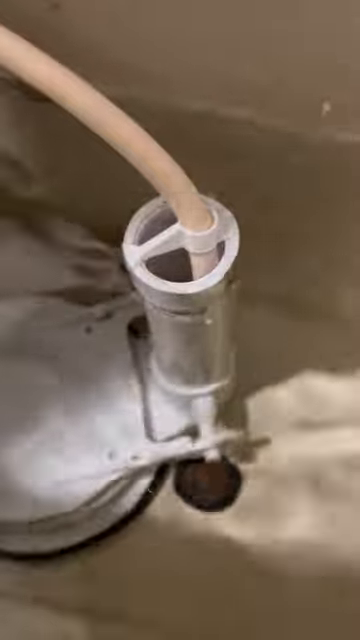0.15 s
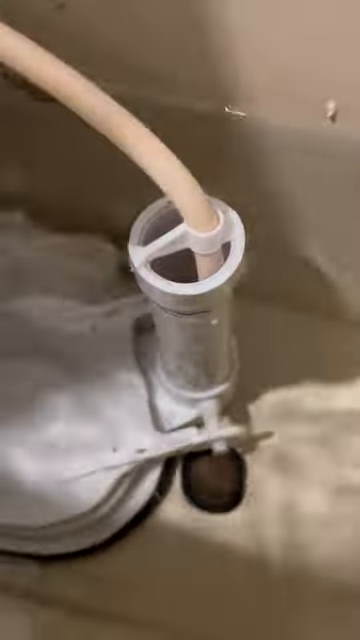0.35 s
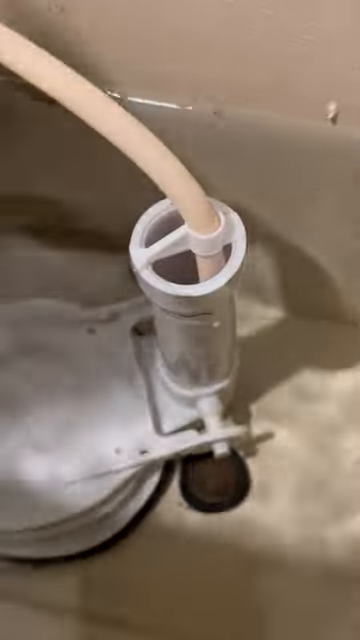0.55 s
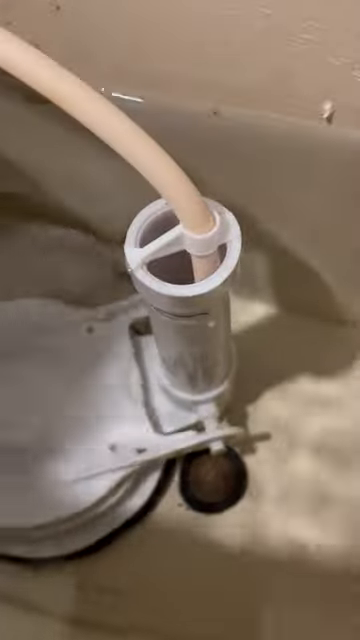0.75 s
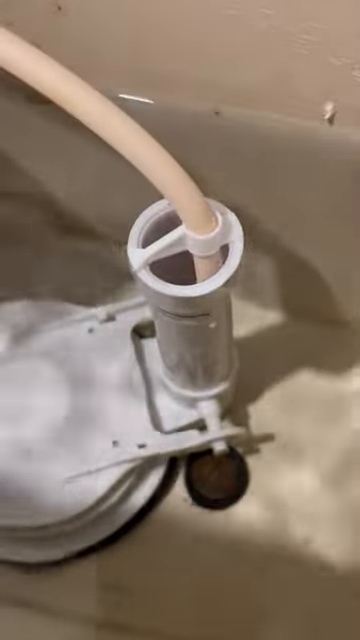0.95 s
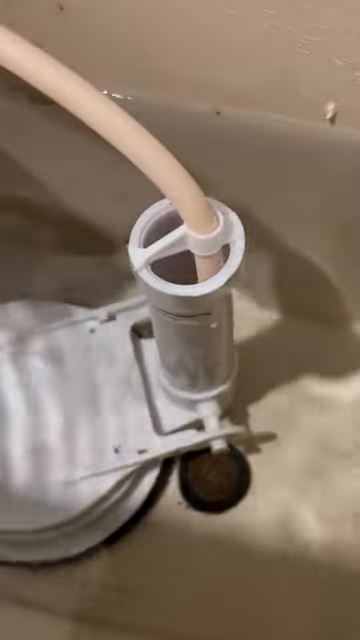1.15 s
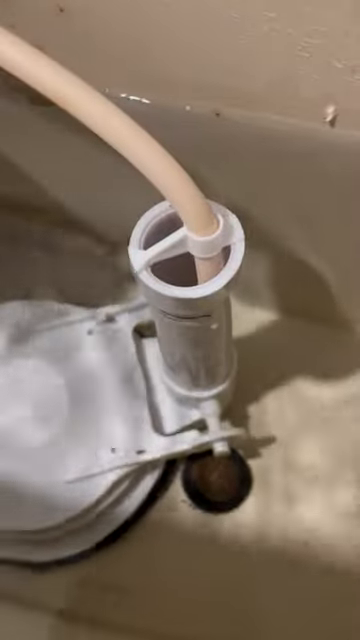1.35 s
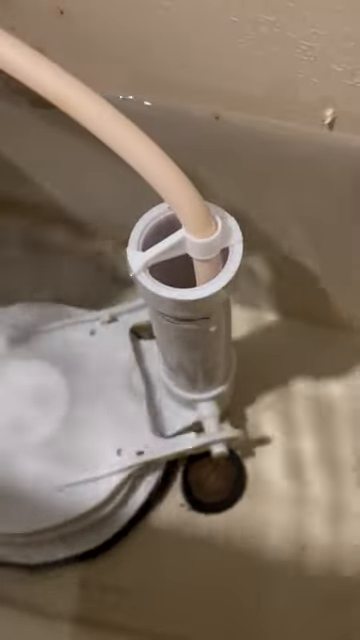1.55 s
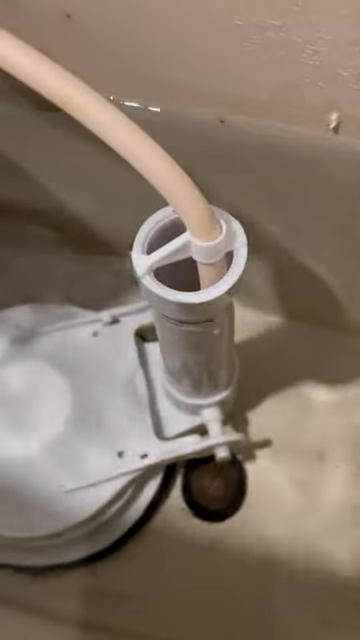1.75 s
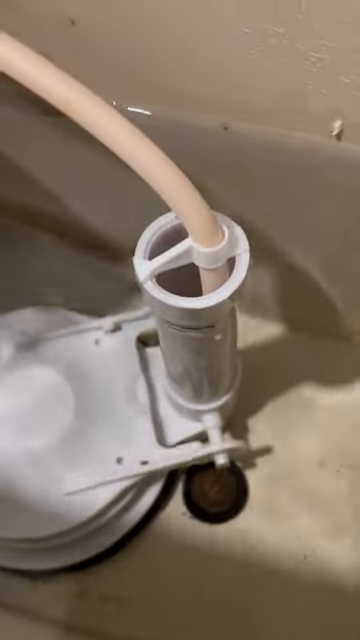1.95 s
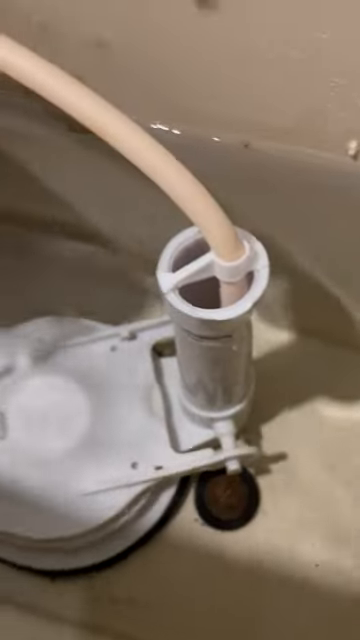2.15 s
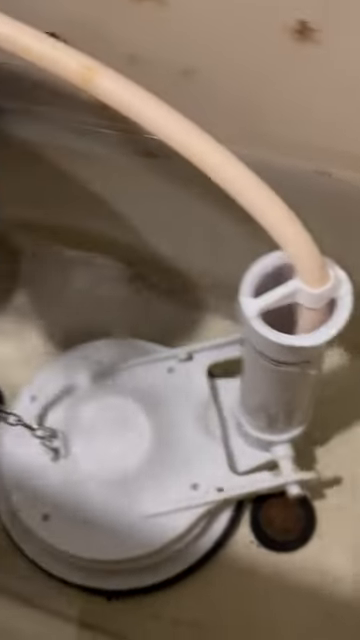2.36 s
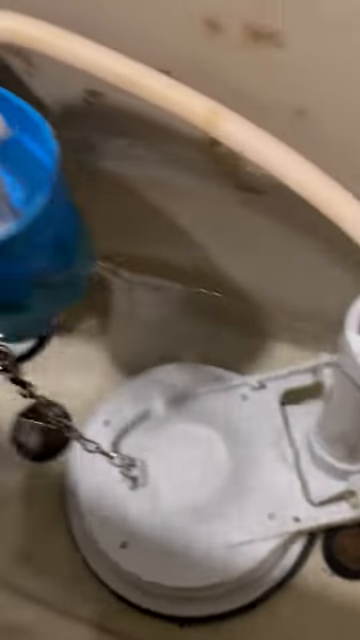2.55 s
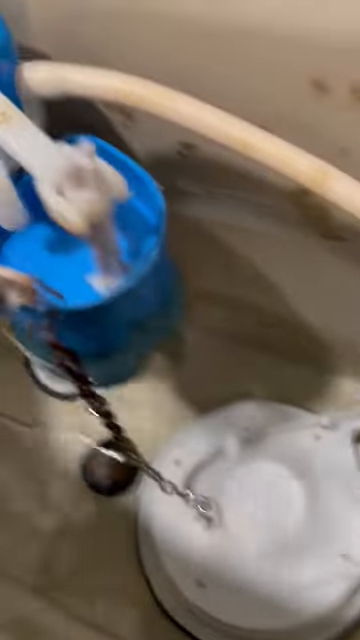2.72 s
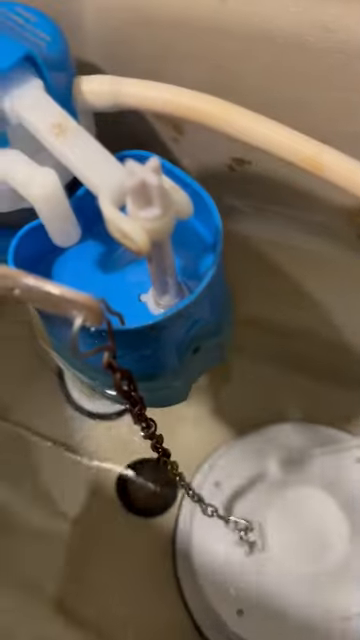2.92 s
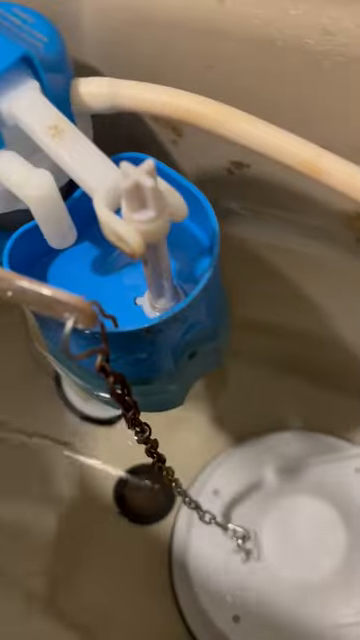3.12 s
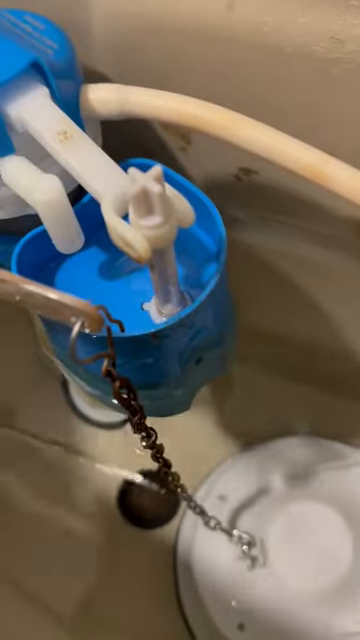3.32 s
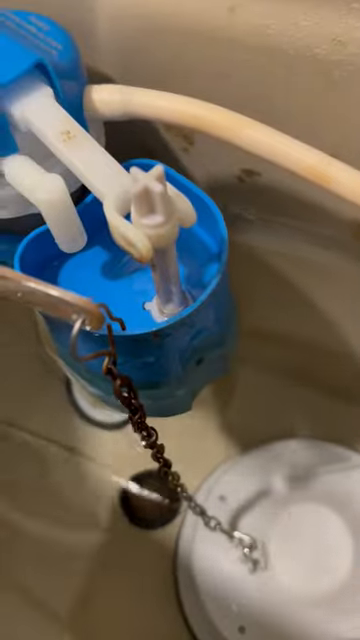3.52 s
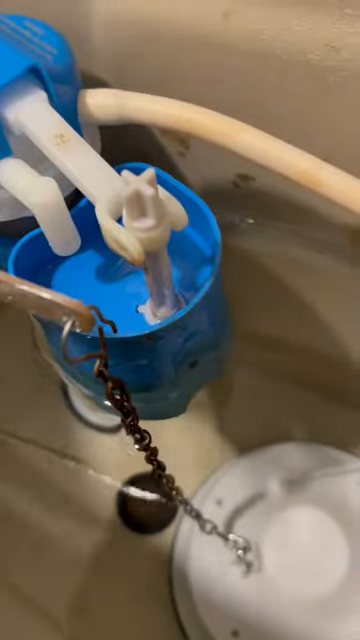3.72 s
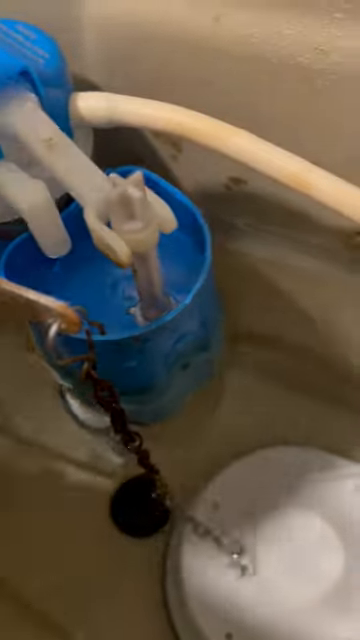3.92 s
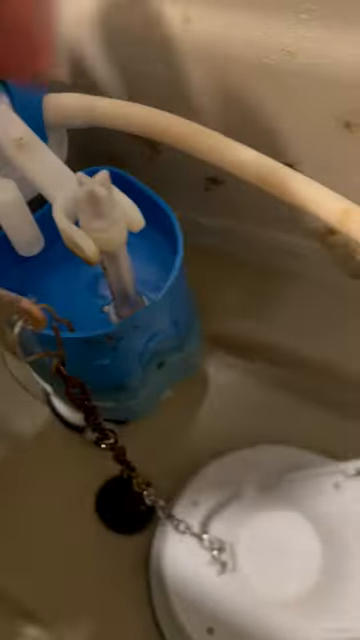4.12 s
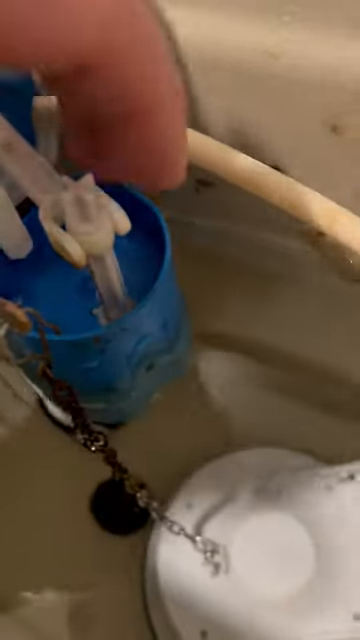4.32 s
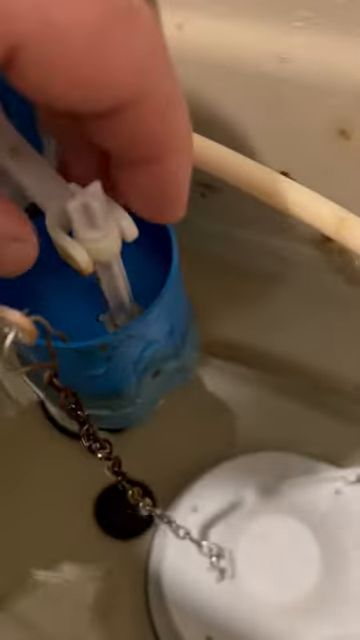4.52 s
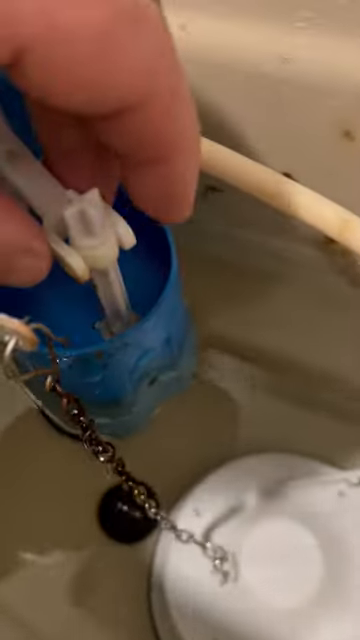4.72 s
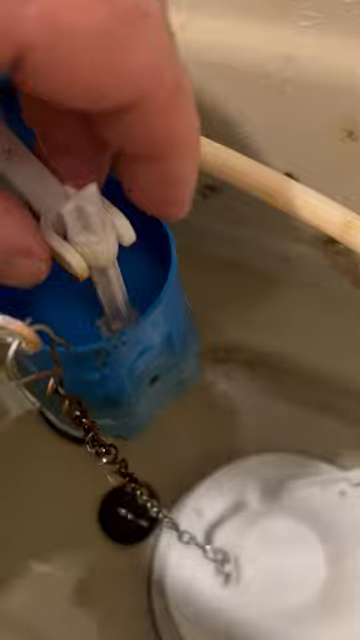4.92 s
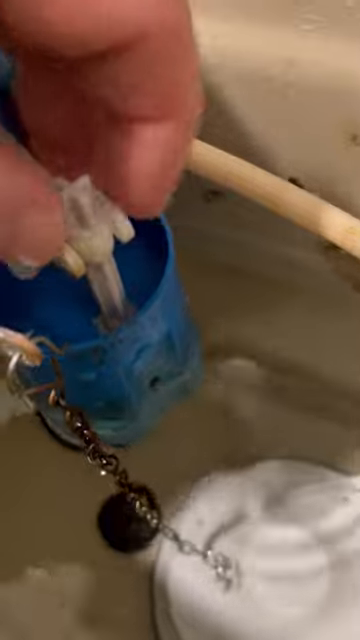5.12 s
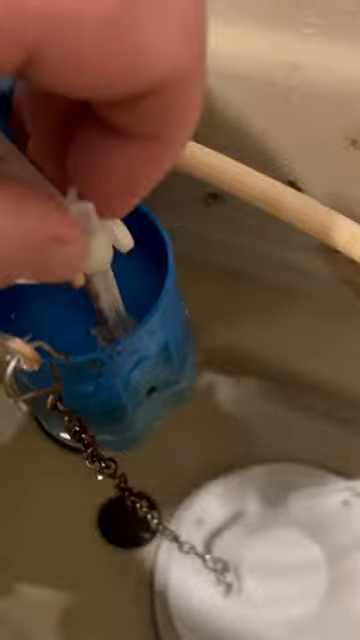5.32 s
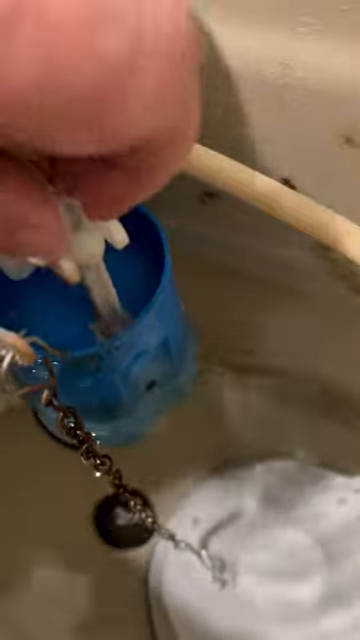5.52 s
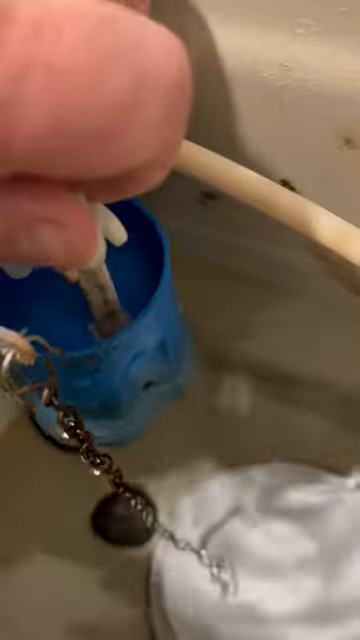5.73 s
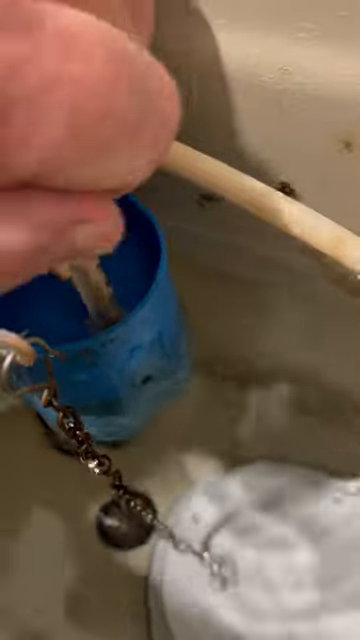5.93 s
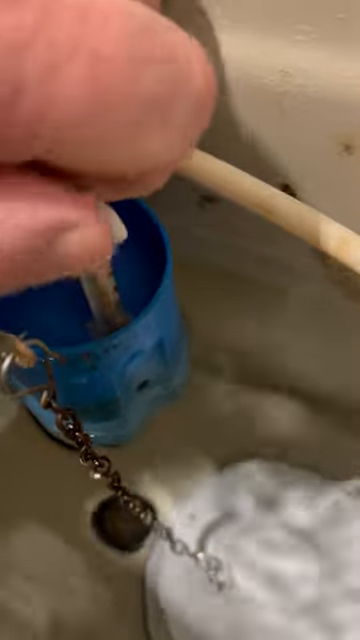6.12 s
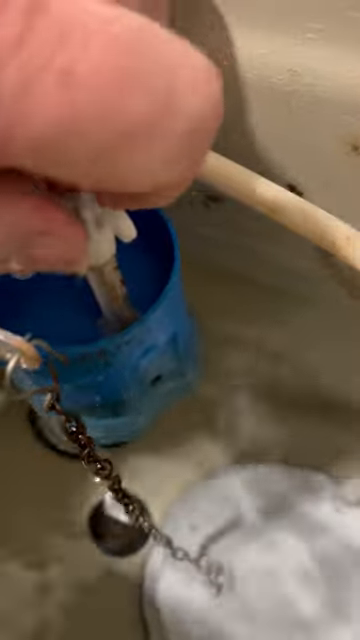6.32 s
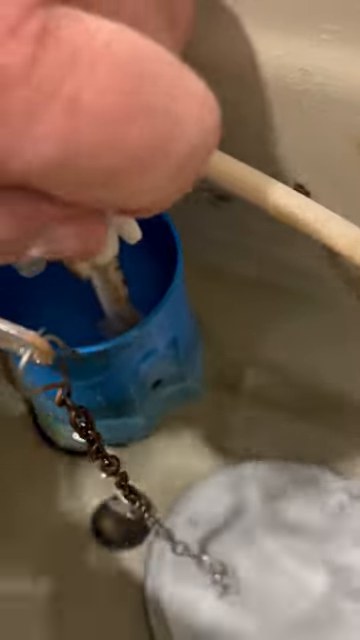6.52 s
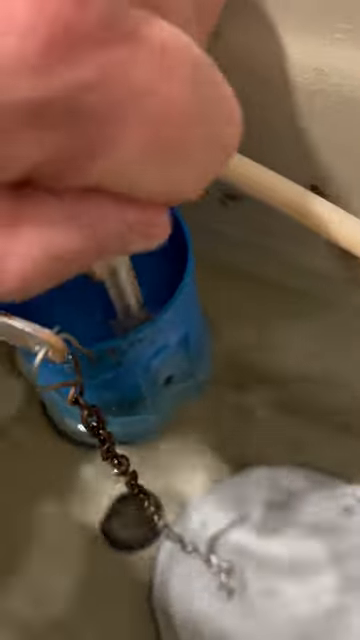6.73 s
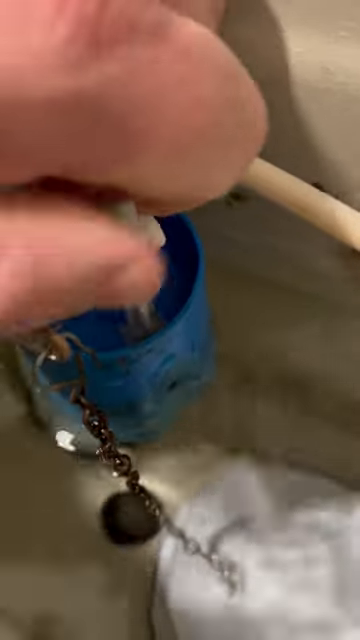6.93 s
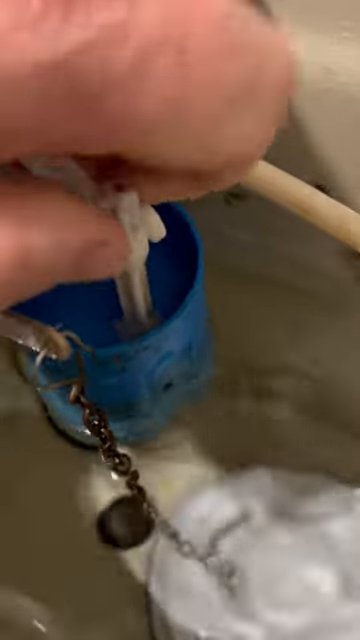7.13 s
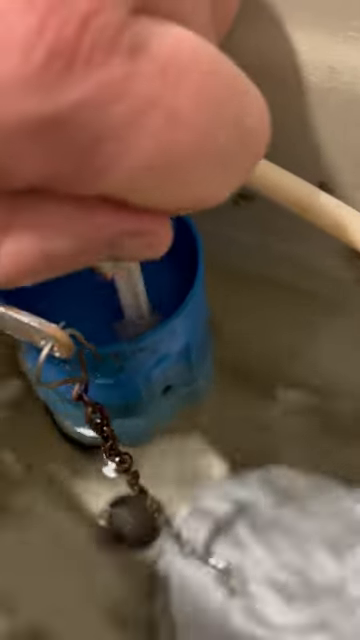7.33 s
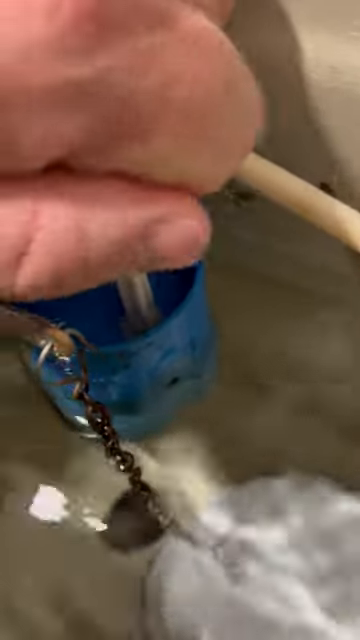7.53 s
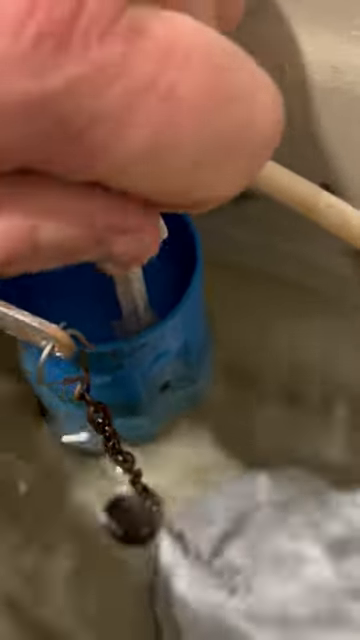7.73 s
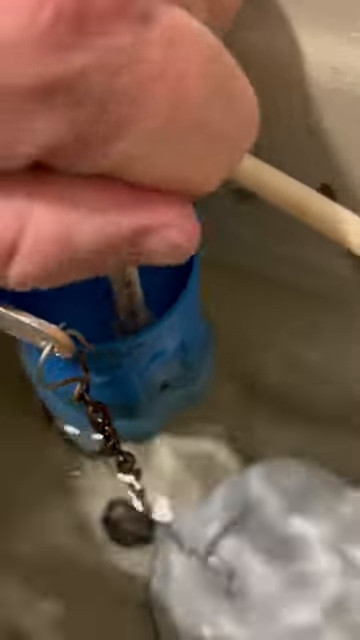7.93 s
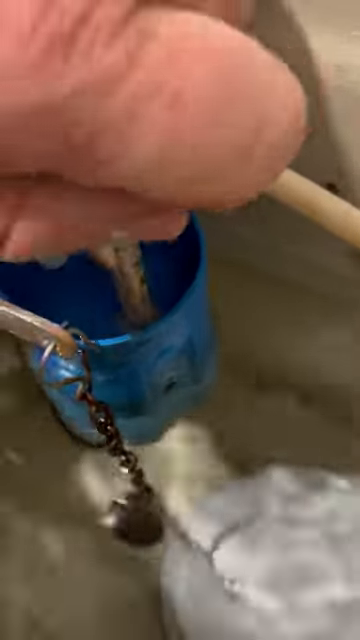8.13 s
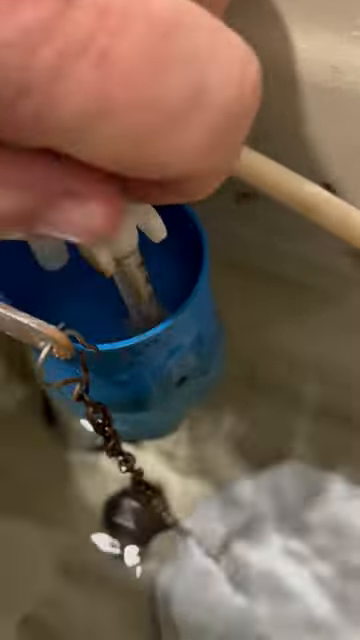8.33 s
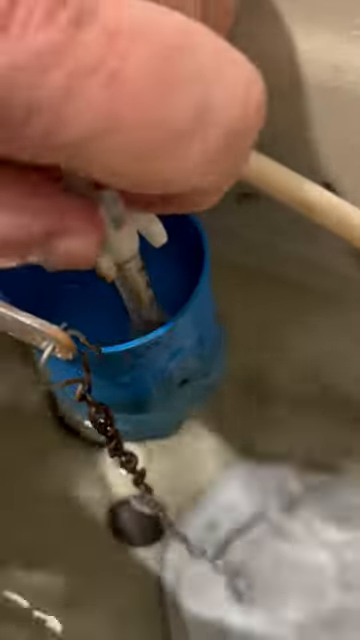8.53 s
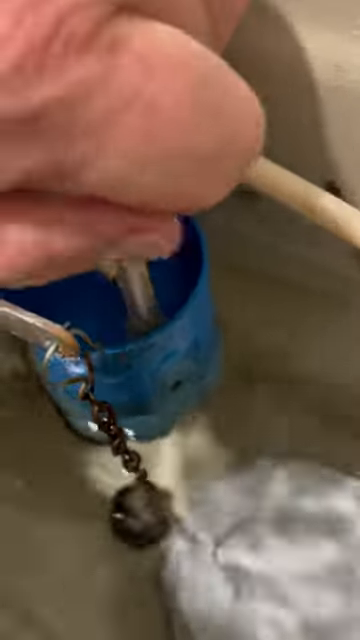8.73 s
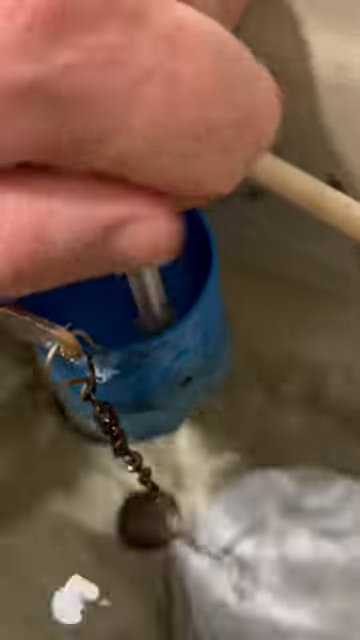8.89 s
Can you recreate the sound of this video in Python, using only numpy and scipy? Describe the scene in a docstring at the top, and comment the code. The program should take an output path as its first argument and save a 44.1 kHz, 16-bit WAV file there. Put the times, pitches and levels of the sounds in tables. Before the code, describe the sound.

Close above an open toilet tank in a small hard-walled bathroom, a faint, bright fill-valve hiss runs steadily over soft low water rumble. It shifts tone as the microphone moves, then stops suddenly. A hand works the float: loose plastic ticks and rubs, sharp double clacks hit the stop, hollow thuds shake the tank, water sloshes and gulps, and the valve spits briefly after each clack.

```python
"""Open toilet tank, handled float

A phone held just above an open tank in a small bathroom. The fill valve hisses (shaped noise) while the phone
moves from the flapper to the float; a hand lifts the float arm and the hiss stops. The hand works the float:
the linkage rubs (grains), ticks and clacks twice against its stop (noise bursts), then the valve spits (noise);
the tank thuds (ringing modes), and the water sloshes (noise) and gulps (rising sines)."""
import sys
import numpy as np
from scipy import signal
from scipy.fft import rfft, irfft, next_fast_len
from scipy.io import wavfile
from scipy.ndimage import uniform_filter1d

SR = 44100
rng = np.random.default_rng(int(sys.argv[2]) if len(sys.argv) > 2 else 0)


def log_audio(samples):
    """Write samples as a 16-bit WAV file to the path given in sys.argv[1]."""
    # one column per channel
    frames = np.atleast_2d(samples).T
    # limit to full scale, then quantise
    limited = np.clip(frames, -1, 1)
    pcm = np.round(limited * 32767).astype(np.int16)
    wavfile.write(sys.argv[1], SR, pcm)


N = 395136
TIME = np.arange(N) / SR
TOP_HZ = 15850  # upper band limit


def undb(db):
    """Decibels to gain."""
    return 10 ** (np.asarray(db) / 20)


def unit(x):
    """Scale to rms 1."""
    return x / np.sqrt(np.mean(x ** 2))


def curves(table):
    """Each column of a table as a control over time."""
    s, *columns = np.transpose(table)
    return [np.interp(TIME, s, column) for column in columns]


def at(points, hz):
    """Read (Hz, value) points on a log-frequency axis."""
    point_hz, value = np.transpose(points)
    return np.interp(np.log(hz + 1e-3), np.log(point_hz), value)


def bumps(rows, hz):
    """Resonant peaks and dips in dB."""
    return sum(db / (1 + (2 * (hz - f) / width) ** 2) for f, width, db in rows)


def colour(x, points, peaks=(), size=4096):
    """Minimum-phase filter with a broad colour and narrow resonances."""
    hz = np.fft.rfftfreq(size, 1 / SR)
    cepstrum = irfft(np.log(undb(at(points, hz) + bumps(peaks, hz))))
    # fold the cepstrum to make the filter causal
    cepstrum[1:size // 2] *= 2
    cepstrum[size // 2 + 1:] = 0
    impulse = irfft(np.exp(rfft(cepstrum)))[:size // 2]
    return signal.fftconvolve(x, impulse)[:len(x)]


def noise():
    """White noise for the whole scene."""
    return rng.standard_normal(N)


def walk(rate_hz):
    """Random levels joined by ramps of 1 / rate_hz s; spread near 1."""
    step = int(SR / rate_hz)
    held = np.repeat(noise()[:N // step + 1], step)
    return 1.2 * uniform_filter1d(held, step)[:N]


def grains(rate_hz, spread_db):
    """Randomly timed tiny impacts of uneven size, rms 1."""
    hits = rng.random(N) < rate_hz / SR
    return unit(hits * np.sign(noise()) * undb(spread_db * np.clip(noise(), -2, 2)))


def add(track, s, sound):
    """Mix a sound in at time s."""
    i = max(int(s * SR), 0)
    track[i:i + len(sound)] += sound[:N - i]


def swells(events, rise_s, fade_s):
    """Linear attack, hold and exponential release for each (s, hold s, dB)."""
    out, t = np.zeros(N), TIME[:SR]
    for s, hold_s, db in events:
        release = np.exp(-np.maximum(t - hold_s, 0) / fade_s)
        add(out, s, undb(db) * np.minimum(t / rise_s, 1) * release)
    return out


# Part that differs between the microphones: (frequency [Hz], gain [dB])
SIDE_GAIN = [(80, -30), (290, -23), (450, -8), (750, -5), (1300, -9), (2000, -13), (4500, -15), (6000, -10),
             (15000, -9)]


def stereo(mid, diffuse):
    """The diffuse part reaches the two microphones in opposite polarity."""
    side = colour(diffuse, SIDE_GAIN)
    return np.array([mid + side, mid - side])


# Hiss level: (time [s], level [dB before HISS_TRIM_DB])
FLOW = [(0.0, -46), (3.7, -47), (4.5, -47)]
# Hiss colour: (frequency [Hz], relative density [dB])
HISS = [(300, -23), (900, -20), (1500, -19.5), (2200, -18.5), (3000, -13.5), (3650, -9.5), (3850, -6),
        (5000, -5.5), (6500, -1.5), (8500, -1), (11000, 0.5), (15500, -0.5)]
# Fixed valve-body resonances: (frequency [Hz], width [Hz], height [dB])
VALVE_BODY = [(880, 200, -7), (1280, 110, 7), (1830, 100, 6), (2150, 200, -3), (3450, 170, -12),
              (5750, 260, 9), (7080, 380, 8)]
# Standing waves between water and wall: (width [Hz], frequency over flapper [Hz], height over flapper [dB],
# frequency over float [Hz], height over float [dB])
STANDING = [(230, 3150, -4, 3170, 7), (200, 4620, 4, 4060, 6), (350, 5300, -3, 5030, 4),
            (350, 6300, -3, 6450, -5), (350, 7650, -5, 7500, -2), (250, 8500, 3, 8520, 4),
            (300, 9400, 3, 9450, 1), (260, 10280, 5, 9870, 8), (220, 10720, -7, 10150, -4),
            (380, 11950, 6, 10480, 8), (300, 12500, -6, 11450, -1), (300, 13100, 3, 11720, 3),
            (400, 13800, -5, 12400, -10), (480, 14400, 6, 13550, 3)]
# Resonances of the cupped hand: (frequency [Hz], width [Hz], height [dB])
CUPPED = [(1130, 300, 8), (1900, 250, 0), (2480, 460, 9), (6400, 510, -11), (7900, 650, 0), (9180, 570, 15),
          (11600, 1300, -6), (15400, 2500, -1)]
HISS_TRIM_DB = 2
PHONE_MOVE_S, CUPPING_S = (2.34, 2.68), (3.96, 5)  # start, end
SHUT_S, SHUT_FADE_S, ECHO_FADE_S = 4.845, 0.017, 0.024


def valve(flutter_db=1.0, size=1024):
    """Water jets through the valve seat; valve body, standing waves and hand shape the hiss until it shuts."""
    hz, s, jet = signal.stft(rng.standard_normal((2, N)), SR, nperseg=size)
    hz = hz[:, None]
    moved = np.interp(s, PHONE_MOVE_S, [0, 1])
    cupped = np.interp(s, CUPPING_S, [0, 1])
    standing = [(f0 + (f1 - f0) * moved, width, db0 + (db1 - db0) * moved)
                for width, f0, db0, f1, db1 in STANDING]
    fixed_db = at(HISS, hz) + bumps(VALVE_BODY, hz)
    moving_db = bumps(standing, hz) + cupped * bumps(CUPPED, hz)
    gain = undb(fixed_db + moving_db) * (hz < TOP_HZ + SR / size)
    level_gain = gain / np.sqrt(np.mean(gain ** 2, axis=0))
    hiss = signal.istft(jet * level_gain, SR)[1][:, :N]
    after = np.maximum(TIME - SHUT_S, 0)
    # jet cuts off fast, its echo lingers slightly longer
    opening = 0.87 * np.exp(-after / SHUT_FADE_S) + 0.091 * np.exp(-after / ECHO_FADE_S)
    return stereo(*hiss) * opening * undb(curves(FLOW)[0] + HISS_TRIM_DB + flutter_db * walk(35))


# Water moving as the tank fills: (time [s], rumble [dB before rumble_db], stirring [dB before stir_db])
CURRENT = [(0.0, -68.5, -74.5), (0.55, -57, -68), (1.45, -65, -75.5), (1.72, -53.5, -67), (2.15, -60, -71),
           (2.45, -65, -88), (2.9, -68.5, -84), (4.1, -67.5, -62), (4.35, -75, -82.5), (4.6, -80, -67)]
# Rumble colour: (frequency [Hz], relative density [dB])
RUMBLE = [(25, -27.5), (58, 5), (80, 0), (105, -5.5), (150, -7.5), (250, -26.5), (600, -41.5)]
# Stirring colour: (frequency [Hz], relative density [dB])
STIR = [(120, -6), (250, -2.5), (380, -3), (600, -5), (850, -20.5), (1500, -16.5), (3000, -39),
        (12000, -62)]


def filling(rumble_db=-1, stir_db=1, heave_db=3):
    """Moving water: a heaving low noise rumble, and stirring made of dense grains."""
    rumble, stir = (undb(c) for c in curves(CURRENT))
    low = rumble * undb(rumble_db + heave_db * walk(8)) * unit(colour(noise(), RUMBLE))
    stirring = stereo(*(unit(colour(grains(1200, 2.8), STIR)) for _ in range(2)))
    return low + stir * undb(stir_db) * stirring


# Soft touches: (time [s], level [dB])
SCUFFS = [(1.651, -59.5), (1.799, -51), (2.491, -69)]


def scuff(touch_s=0.0089, slide_db=-7, slide_s=0.12, rise_s=0.0033):
    """Something touches softly and slides for a moment: friction noise with a short and a long decay."""
    touches = [(s, 0, db) for s, db in SCUFFS]
    dull = [(200, -5), (900, -1), (1400, 3), (1900, -3), (2800, -33), (8000, -47)]
    friction = unit(colour(noise(), dull))
    slide = undb(slide_db) * swells(touches, rise_s, slide_s)
    return friction * (swells(touches, rise_s, touch_s) + slide)


def bump(s=2.062, peak_db=-41, ring_hz=175, ring_width_hz=60, ring_db=6):
    """A finger bumps the phone before it moves: one impulse through a dull resonance."""
    push = np.zeros(N)
    add(push, s, np.ones(1))
    dull_colour = [(60, -6), (170, 3), (300, 6), (450, -18), (1000, -41), (4000, -75)]
    dull = colour(push, dull_colour, [(ring_hz, ring_width_hz, ring_db)])
    return undb(peak_db) * dull / np.abs(dull).max()


# How hard the hand works the float: (time [s], effort [dB before each layer's trim])
EFFORT = [(4.3, -87), (4.55, -69), (4.93, -60.5), (5.22, -50), (5.36, -44), (5.62, -53), (5.85, -38.5),
          (6.12, -43.5), (6.33, -53.5), (6.58, -47), (6.78, -41), (7.06, -56), (7.25, -45), (7.5, -47),
          (7.68, -50), (8.15, -38), (8.56, -51.5), (8.8, -39.5)]
# Slosh colour: (frequency [Hz], relative density [dB])
SLOSH = [(25, -40), (45, -36.5), (70, -0.5), (105, 4.5), (135, -2), (190, -1), (260, -11.5), (600, -51)]


def sloshing(slosh_db=-4, surge_db=-5, surge_rise_s=0.0058, surge_fade_s=0.069, rock_db=3):
    """Low noise: water rocks unevenly with the hand's effort and surges after each thud."""
    surge = swells([(s, 0, boom_db + surge_db) for s, _, boom_db in THUDS], surge_rise_s, surge_fade_s)
    rocking = undb(curves(EFFORT)[0] + slosh_db + rock_db * walk(11))
    return np.hypot(rocking, surge) * unit(colour(noise(), SLOSH))


def bubble(hz, cycles, glide):
    """A decaying sine for a pocket of air; pitch rises from hz by the fraction glide."""
    length = int(cycles * SR / hz)
    age = np.arange(length) / length
    ring = np.sin(2 * np.pi * cycles * age * (1 + glide * age / 2))
    return ring * np.exp(-np.log(1000) * age) * np.minimum(age * cycles, 1)


def gurgle(low_hz, high_hz, cycles, spread_db, count):
    """Randomly timed bubbles of mixed sizes, rms 1."""
    out = np.zeros(N)
    for when, size, force in rng.random((count, 3)):
        hz = low_hz * (high_hz / low_hz) ** size
        add(out, when * N / SR, undb(spread_db * force) * bubble(hz, cycles, glide=0.15))
    return unit(out)


def knocking(gulp_db=-8, knock_db=-7, plop_db=-19, wake_db=-7, wake_rise_s=0.0083, wake_fade_s=0.041,
             lurch_db=3):
    """The float lurches on the tank (grains into its modes), gulps and plops (bubbles), more after each thud."""
    wake = swells([(s, 0, wall_db + wake_db) for s, wall_db, _ in THUDS], wake_rise_s, wake_fade_s)
    gulps = stereo(*(gurgle(low_hz=257, high_hz=480, cycles=22, spread_db=12, count=360) for _ in range(2)))
    plops = gurgle(low_hz=477, high_hz=1710, cycles=27, spread_db=9, count=160)
    knock_colour = [(100, -22.0), (260, -6), (500, -1), (1200, 1.5), (4000, -17.0)]
    jostle = unit(colour(tank(grains(300, 4.0), TANK), knock_colour))
    drive = np.hypot(undb(curves(EFFORT)[0] + lurch_db * walk(25)), wake)
    return drive * (undb(gulp_db) * gulps + undb(plop_db) * plops + undb(knock_db) * jostle)


def chatter(t60_s, rise_s):
    """Dense micro-impacts: noise with its spectrum evened, with the energy of an envelope peaking near 1."""
    t = TIME[:SR // 16]
    decay = np.exp(-np.log(1000) * np.maximum(t - 2 * rise_s, 0) / t60_s)
    shape = np.minimum(t / rise_s, 1) * decay
    phase = np.angle(rfft(shape * rng.standard_normal(len(t))))
    even = irfft(np.exp(1j * phase)) * shape ** (1 / 4)
    return even * np.linalg.norm(shape) / np.linalg.norm(even)


# Stem slides in its guide: (time [s], length [s], level [dB before rub_db])
SLIDES = [(5.285, 0.11, -34), (5.78, 0.18, -35.5), (6.05, 0.082, -43), (6.89, 0.079, -53),
          (7.28, 0.061, -41.5), (8.08, 0.067, -32.5), (8.25, 0.094, -42), (8.635, 0.11, -43.5)]
# Rubbing colour: (frequency [Hz], relative density [dB])
RUB = [(300, 3.5), (550, -1), (850, -1.5), (1200, 0.5), (1800, -4.5), (2800, -2), (5000, -9.5),
       (8500, -10.5), (11000, -41), (16000, -52.5)]


def rubbing(rub_db=-8, trickle_db=-15, slip_db=4, creep_db=-5, rise_s=.012, fade_s=0.017, settle_db=-33,
            settle_s=0.093, tick_db=-12):
    """Stick-slip grains excite the linkage: faint with the effort, louder in slides and after each stop."""
    creep = undb(curves(EFFORT)[0] + creep_db)
    settling = swells([(s + rebound_s, 0, settle_db) for s, rebound_s, *_ in STOPS], rise_s, settle_s)
    slip = np.sqrt(creep ** 2 + swells(SLIDES, rise_s, fade_s) ** 2 + settling ** 2)
    rub = stereo(*(unit(colour(grains(2000, 2.4), RUB, LINKAGE)) for _ in range(2)))
    friction = rub * undb(rub_db + slip_db * walk(70))
    # many tiny bubbles break along the float's rim
    trickle = undb(trickle_db) * gurgle(low_hz=1150, high_hz=3270, cycles=70, spread_db=23, count=1300)
    # loose joints tick faintly at random
    ticks = signal.fftconvolve(grains(12, 3), chatter(t60_s=0.019, rise_s=0.00033))[:N]
    return slip * (friction + trickle) + creep * undb(tick_db) * unit(colour(ticks, RUB, LINKAGE))


# Modes of the tank and the air above the water: (frequency [Hz], t60 [s], level [dB])
TANK = [(73, 0.16, -3.5), (104.3, 0.17, 4), (157.3, 0.16, -5), (189, 0.28, -4), (285, 0.086, -0.5),
        (303.1, .24, 3), (361.8, 0.46, -10), (402, 0.4, -20.5), (567.5, 0.088, -11), (1250, .1, -34.5),
        (1550, .1, -22.5)]


def tank(force, modes):
    """A force rings the tank's decaying sine modes."""
    t = TIME[:SR // 2]
    ring = sum(undb(db) * np.sin(2 * np.pi * hz * t) * np.exp(-np.log(1000) * t / t60_s)
               for hz, t60_s, db in modes)
    return signal.fftconvolve(force, ring)[:N]


# Float and hand on the tank: (time [s], wall push [dB before wall_db], deep push [dB before boom_db])
THUDS = [(4.52, -49, -66), (4.644, -42.5, -56), (4.866, -46.5, -53), (5.153, -52, -47.5), (5.313, -39, -37),
         (5.464, -33, -49), (5.577, -35, -46), (5.708, -30.5, -41), (5.784, -22, -46), (5.899, -32.5, -41),
         (5.945, -37, -31), (6.052, -18.5, -37), (6.327, -35.5, -51), (6.711, -29.5, -31),
         (6.903, -36.5, -42.5), (7.368, -25, -31), (7.428, -21, -45), (7.549, -27.5, -38),
         (7.733, -35.5, -39), (7.833, -33, -32), (7.879, -28, -51), (7.989, -37.5, -37), (8.128, -22, -36),
         (8.352, -32, -42), (8.647, -32, -46), (8.675, -32, -52), (8.765, -15, -25.5), (8.906, -29.5, -60)]


def thuds(wall_db=-5, boom_db=2, push_s=0.0022, deep_modes=4):
    """Blunt pushes ring the walls; their deep part, shifting the water, drives the lowest modes."""
    wall, boom, t = np.zeros(N), np.zeros(N), TIME[:SR // 20]
    push = t * np.exp(-2 * np.pi * t / push_s)
    push = push / push.sum()
    for s, ring_db, deep_db in THUDS:
        add(wall, s, undb(ring_db + wall_db) * push)
        add(boom, s, undb(deep_db + boom_db) * push)
    return tank(boom, TANK[:deep_modes]) + tank(wall, TANK[deep_modes:])


# Single linkage clicks: (time [s], level [dB before body_db], treble [dB before treble_db], favoured pitch [Hz])
CLICKS = [(4.573, -37.5, -20, 8830), (4.857, -31.5, -4, 2930), (4.97, -23.5, -17, 1820),
          (5.034, -20, -13, 2960), (5.228, -35.5, -15.5, 1200), (5.29, -33, -16, 3050),
          (5.314, -22.5, -7, 1180), (5.363, -27, -8, 1240), (5.411, -31, -30.5, 1170),
          (5.531, -32.5, -14, 1550), (5.653, -36.5, -21, 1160), (5.705, -11, -0.5, 7680),
          (5.843, -29, -14, 1170), (6.113, -25.5, -14.5, 1540), (6.183, -28, -8.5, 4020),
          (6.245, -32, -10.5, 3020), (6.262, -27.5, -19, 3010), (6.408, -27.5, -17.5, 1190),
          (6.969, -35.5, -13, 2170), (7.155, -36, -14, 2950), (7.197, -29, -10.5, 3150),
          (7.365, -17, 0, 7900), (7.57, -30, -19.5, 1170), (7.688, -38, -3.5, 1150),
          (7.775, -24.5, -22.5, 2070), (7.788, -34.5, 2.5, 1070), (8.065, -28, -2, 5500),
          (8.091, -28, -9, 1180), (8.118, -33, -8, 1140), (8.148, -34.5, -0.5, 2500),
          (8.243, -27.5, -7.5, 1180), (8.271, -26.5, -11.5, 2970), (8.304, -25, -8, 2490),
          (8.459, -29, -20, 1210), (8.586, -37.5, -26, 1170), (8.675, -35.5, -13, 2990),
          (8.709, -28.5, -5.5, 1170)]
# Stop hits, then a spit: (time [s], rebound delay [s], first level [dB before body_db], first pitch [Hz],
# rebound level [dB before body_db], rebound pitch [Hz], spurt level [dB before spurt_db], whistle [Hz])
STOPS = [(5.910, .0225, -12.5, 7300, -10, 3270, -39.5, 8400),
         (6.689, .019, -11, 3120, -10, 2610, -39.5, 8350),
         (7.352, .0345, -9.5, 6130, -13.5, 4540, -34.5, 4550),
         (7.807, .015, -13, 9000, -8.5, 5520, -35, 8260), (8.733, 0.021, -12, 8200, -7, 2700, -41, 7900)]
FIRST_TREBLE_DB, REBOUND_TREBLE_DB = 2.5, -1.5  # at STOP_PITCH_HZ
STOP_PITCH_HZ, TREBLE_DB_PER_OCTAVE = 5100, 1  # a higher-pitched hit is also brighter
# dull tick that starts each thud, level relative to its wall push
THUD_TICK_DB, THUD_TICK_TREBLE_DB, THUD_TICK_HZ = -11, -26, 1200


def contacts():
    """Every plastic contact as (s, level dB, treble dB, pitch Hz): clicks, stops with rebounds, thud ticks."""
    rows = list(CLICKS)
    for s, rebound_s, first_db, first_hz, second_db, second_hz, _, _ in STOPS:
        hits = [(s, first_db, FIRST_TREBLE_DB, first_hz),
                (s + rebound_s, second_db, REBOUND_TREBLE_DB, second_hz)]
        for when, db, treble_db, hz in hits:
            brighter_db = TREBLE_DB_PER_OCTAVE * np.log2(hz / STOP_PITCH_HZ)
            rows.append((when, db, treble_db + brighter_db, hz))
    return rows + [(s, wall_db + THUD_TICK_DB, THUD_TICK_TREBLE_DB, THUD_TICK_HZ) for s, wall_db, _ in THUDS]


# Contact colour: (frequency [Hz], relative density [dB])
CRACK = [(150, -8.5), (400, 1), (800, -11), (1200, -4.5), (1800, -5.5), (2700, 3), (4500, 2), (6500, 5),
         (9000, 6), (11500, 0.5), (13000, -6), (16000, -6.5)]
# Linkage resonances: (frequency [Hz], width [Hz], height [dB])
LINKAGE = [(1182, 92, 14.5), (1426, 8.9, -1), (1550, 17, 11.5), (2100, 48, 8.5), (2470, 50, 6.5),
           (2870, 29, 4), (3024, 49, 9), (3535, 220, -6), (4017, 100, 6.5), (4620, 210, 2.5),
           (5500, 380, 4), (6500, 1100, -2.5), (7520, 60, 3.5), (8380, 220, 2.5), (9620, 160, 2)]


def clacks(body_db=-4, treble_db=2, top_loss=1.0, rise_s=0.00099, bright_t60_s=0.022, linger_per_db=0.027,
           focus_db=6, focus_width_hz=450, uneven_db=5, uneven_width_hz=260, uneven_count=14):
    """Contacts chatter and ring the linkage, with one favoured pitch and random peaks; duller ones last longer."""
    out = np.zeros(N)
    for s, db, bright_db, hz in contacts():
        shelf_db, dullness_db = bright_db + treble_db, max(-bright_db, 0)
        brightness = [(3500, 0.012), (6000, shelf_db), (14000, shelf_db - top_loss * dullness_db)]
        burst = chatter(bright_t60_s * (1 + linger_per_db * dullness_db), rise_s)
        # alternate peaks and dips at random pitches
        uneven = [(f, uneven_width_hz, uneven_db * (-1) ** k)
                  for k, f in enumerate(rng.uniform(1550, 11000, uneven_count))]
        focus = [(hz, focus_width_hz, focus_db)]
        add(out, s, undb(db + body_db) * colour(burst, brightness, focus + uneven, size=512))
    return colour(out, CRACK, LINKAGE)


# Bathroom decay: (frequency [Hz], t60 [s])
ROOM_T60 = [(100, 0.46), (400, 0.98), (1200, 0.32), (3000, 0.41), (8000, 0.38), (14000, 0.42)]


def bathroom(x, onset_s=0.0027, size=256):
    """Dense echoes from hard walls: noise tails whose decay time depends on frequency."""
    hz, s, echoes = signal.stft(rng.standard_normal((2, SR)), SR, nperseg=size)
    decay = np.exp(-np.log(1000) * s / at(ROOM_T60, hz)[:, None]) * np.minimum(s / onset_s, 1)
    tails = signal.istft(echoes * decay, SR)[1]
    return stereo(*(signal.fftconvolve(x, tail / np.linalg.norm(tail))[:N] for tail in tails))


# Bubbles trapped by the float: (time [s], starting pitch [Hz], level [dB])
BUBBLES = [(5.41, 2100, -41), (6.825, 1830, -40), (7.985, 2334, -21.5), (8.859, 1530, -36),
           (8.901, 2070, -30)]


def plips(cycles=65, glide=0.15):
    """The few bubbles that stand out, each a rising, decaying sine."""
    out = np.zeros(N)
    for s, hz, db in BUBBLES:
        add(out, s, undb(db) * bubble(hz, cycles, glide))
    return out


# Spurt colour: (frequency [Hz], relative density [dB])
SPIT = [(500, -12.5), (1500, -7.5), (3000, -3.5), (5000, 1), (7000, 2), (9200, -0.5), (10500, -7),
        (15000, -10)]


def spurts(spurt_db=-1, whistle_db=8, whistle_width_hz=350, sputter_db=4.0, rise_s=0.0097, fade_s=0.094,
           dull_s=.11, dull_hz=10000, drops_db=-5):
    """After each rebound a sputtering jet of noise and droplet grains turns dull and dies as the valve reseats."""
    out, t = np.zeros(N), TIME[:SR // 2]
    lowpass = signal.butter(4, dull_hz, fs=SR, output="sos")
    spray = noise() + undb(drops_db) * grains(540, 4)
    for k, (s, rebound_s, *_, db, hz) in enumerate(STOPS):
        piece = spray[k * len(t):(k + 1) * len(t)]
        jet = unit(colour(piece, SPIT, [(hz, whistle_width_hz, whistle_db)] + list(LINKAGE)))
        dull = signal.sosfiltfilt(lowpass, jet)
        slowing = dull + (jet - dull) * np.exp(-t / dull_s)
        envelope = np.minimum(t / rise_s, 1) * np.exp(-t / fade_s)
        add(out, s + rebound_s, undb(db + spurt_db) * slowing * envelope)
    return out * undb(sputter_db * walk(120))


# Valve seeps while the float is held low: (time [s], length [s], level [dB])
SEEPS = [(7.072, .07, -59), (8.31, 0.06, -60)]


def seeping(hz=6800, width_hz=3000, focus_db=14, rise_s=0.008, fade_s=0.038):
    """A thin hiss slips past the valve seat: noise with one broad peak."""
    return swells(SEEPS, rise_s, fade_s) * unit(colour(noise(), SPIT, [(hz, width_hz, focus_db)]))


def scene(clack_room_db=-10, thud_room_db=-13, spray_db=3):
    """The valve, the handled float and the room."""
    plastic, blows, bubbles = clacks(), thuds(), plips()
    echo = bathroom(undb(clack_room_db) * plastic + undb(thud_room_db) * (blows + bubbles))
    spray = stereo(spurts(), undb(spray_db) * spurts())
    water = valve() + filling() + sloshing() + spray + seeping() + bubbles
    handling = scuff() + bump() + knocking() + rubbing() + blows + plastic
    return water + handling + echo


# Phase lead of the right microphone over the left: (frequency [Hz], phase [rad])
LEAD = [(1800, 0), (3200, -.3), (4900, -.05), (5400, 1.05), (7000, 1.3), (11000, 1.4), (16000, 1.65)]
LOW_HZ = 48


def record(dry):
    """Two microphones shed deep bass and differ in treble phase; peaks are rounded, the top is cut."""
    size = next_fast_len(N + SR // 10)
    lead = at(LEAD, np.fft.rfftfreq(size, 1 / SR))
    turn = np.exp(1j * np.outer([-1, 1], lead) / 2)
    lean = signal.sosfilt(signal.butter(3, LOW_HZ, "high", fs=SR, output="sos"), dry)
    heard = np.tanh(irfft(rfft(lean, size) * turn, size)[:, :N])
    return signal.sosfilt(signal.ellip(10, .2, 70, TOP_HZ, fs=SR, output="sos"), heard)


dry = scene()
out = record(dry)
log_audio(out)
```